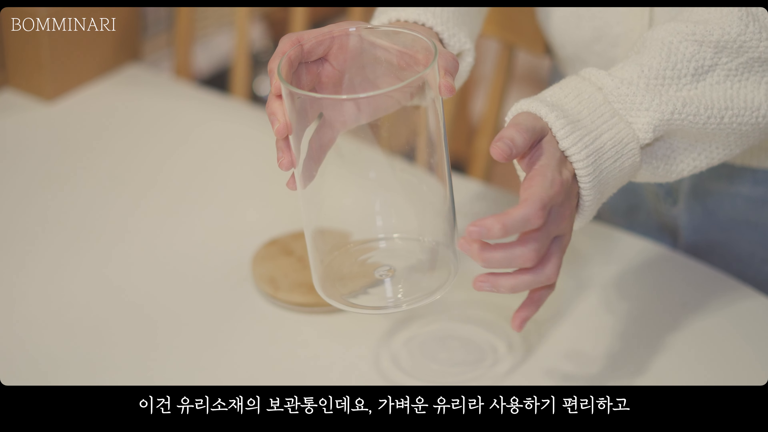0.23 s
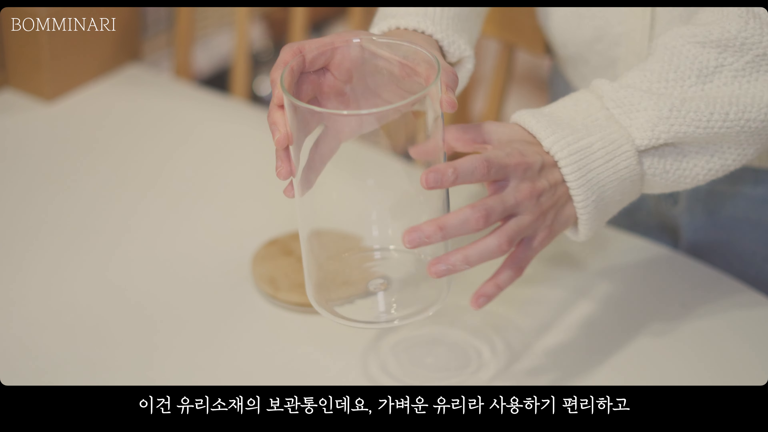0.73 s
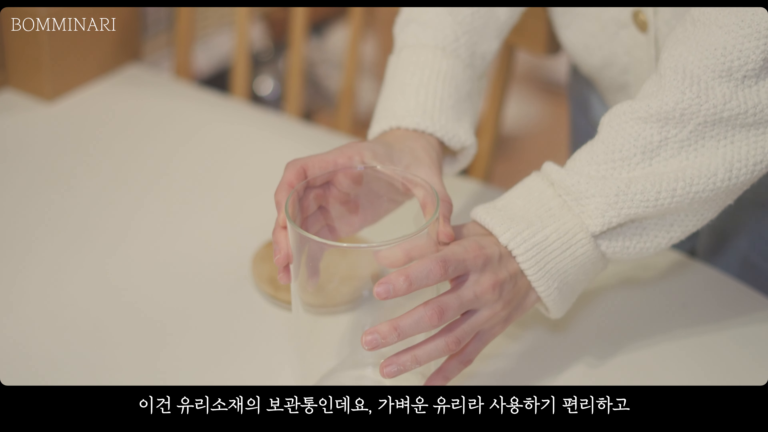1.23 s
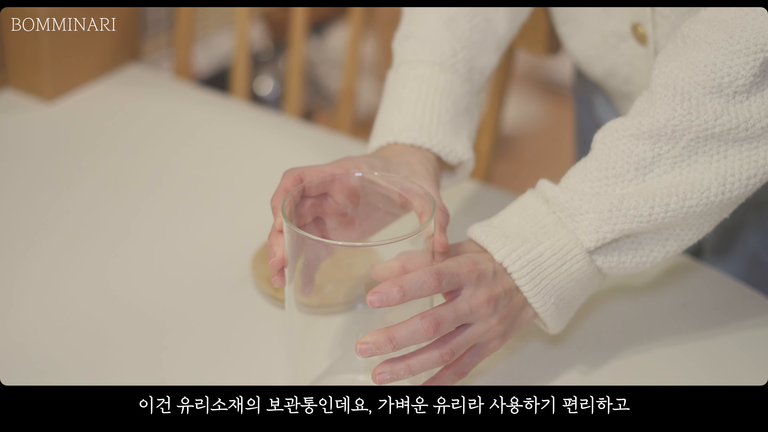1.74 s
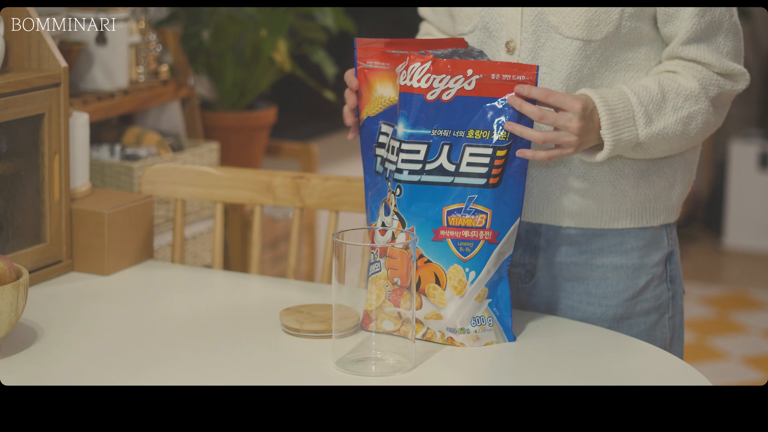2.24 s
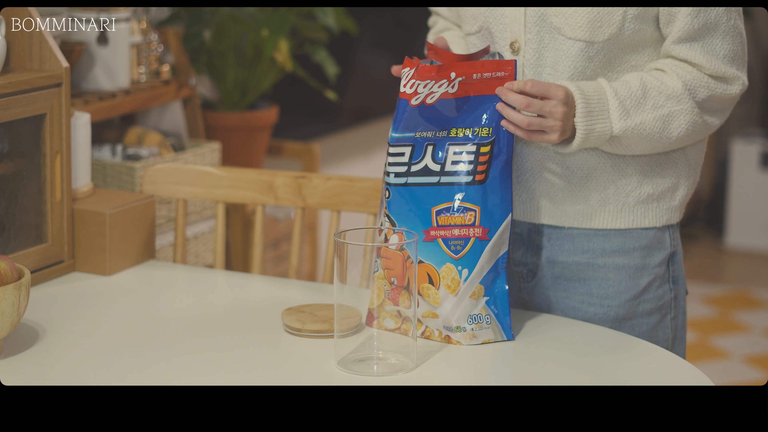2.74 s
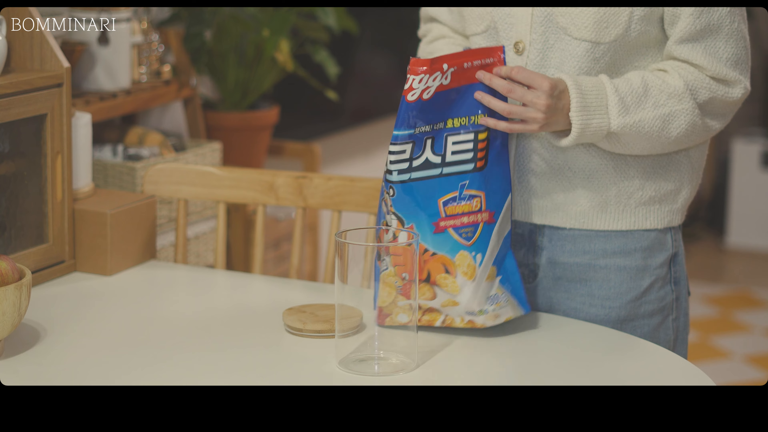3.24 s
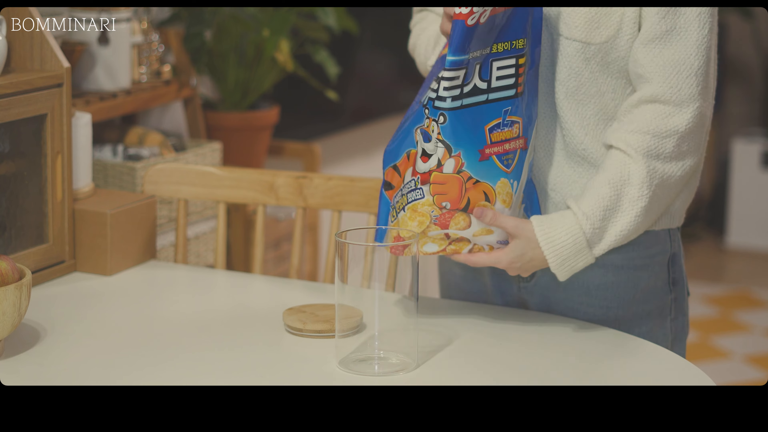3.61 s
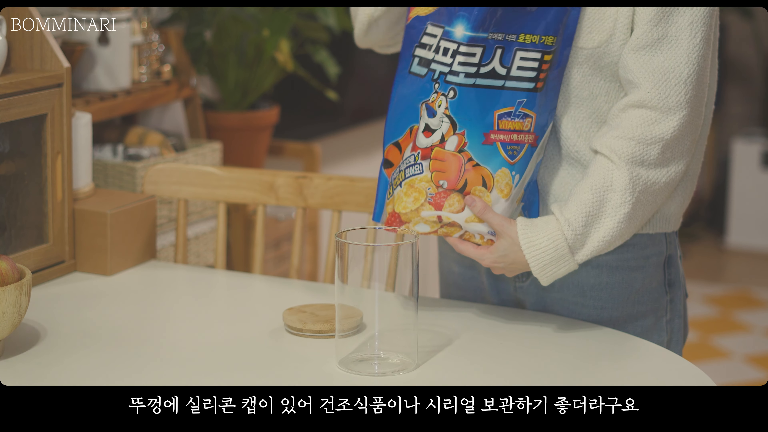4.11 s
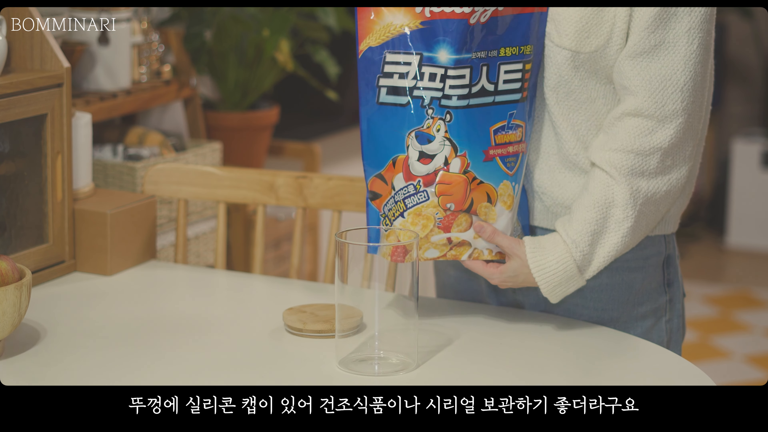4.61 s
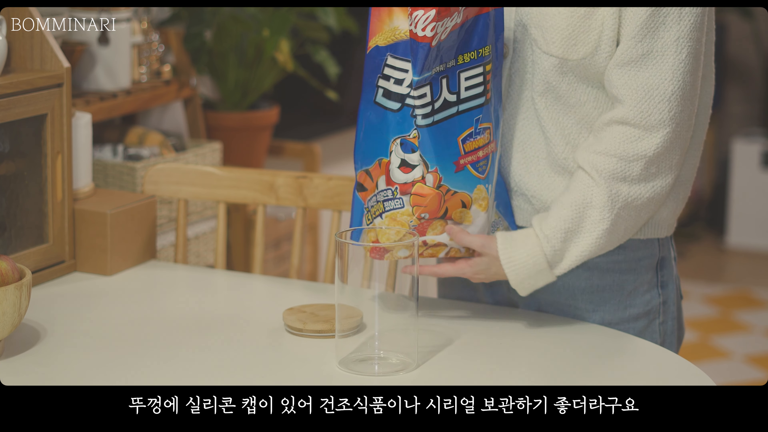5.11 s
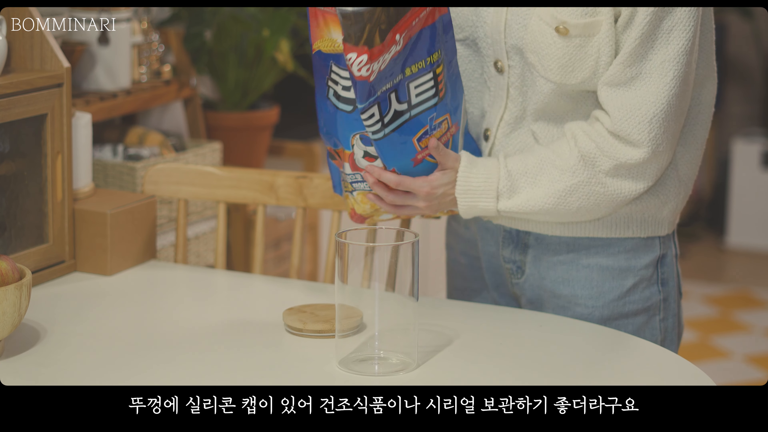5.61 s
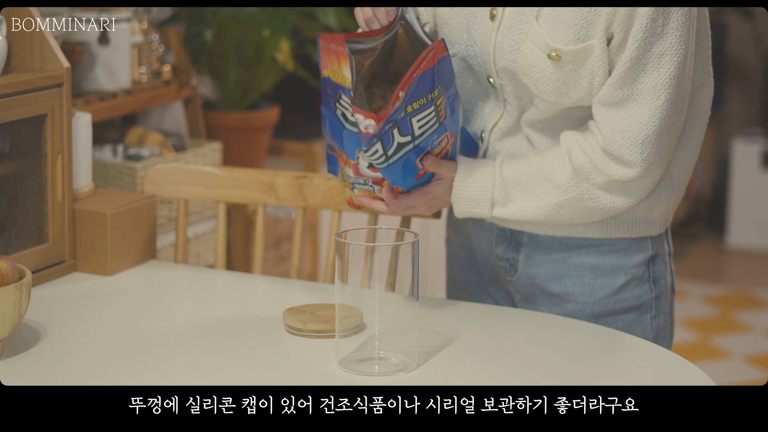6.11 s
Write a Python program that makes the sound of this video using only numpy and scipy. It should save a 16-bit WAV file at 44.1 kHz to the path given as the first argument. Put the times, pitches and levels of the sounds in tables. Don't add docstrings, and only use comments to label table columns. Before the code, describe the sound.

In a small hard kitchen, glass clinks faintly, a wooden lid knocks twice, and a crinkly bag of cereal is noisily gripped and tipped.

```python
import sys
import numpy as np
from scipy import signal
from scipy.fft import rfft, irfft
from scipy.io import wavfile
from scipy.ndimage import uniform_filter1d

SR = 44100
rng = np.random.default_rng(int(sys.argv[2]) if len(sys.argv) > 2 else 0)


def how_loud(loudness_db):
    steps = np.asarray(loudness_db, float) / 20
    return 10 ** steps


def unload_audio(sound):
    columns = np.transpose(np.atleast_2d(sound))
    steps = np.round(np.clip(columns, -1, 1) * 32767)
    wavfile.write(sys.argv[1], SR, steps.astype(np.int16))


N = 280476

# start in seconds, peak of the clear tones in dB,
# peak of the woody noise in dB, time for that noise to die by 60 dB in seconds.
KNOCKS = [
    (1.366, -19.5, -17, 0.24),
    (1.6013, -17.5, -15, 0.075),
]
# time of the peak in seconds, level in dB, rise and fall
# in seconds per 20 dB, brightness in dB.
MOVES = [(2.39, -43, 0.092, 0.05, -9), (2.476, -40, 0.17, 0.3, -27), (2.766, -39, 0.27, 0.18, -31),
         (3.039, -36, 0.23, .085, -28), (3.3, -39, 0.19, 0.13, -7), (3.47, -54.5, .5, .3, -6),
         (3.7, -45, 0.064, 0.44, -1), (3.87, -41.5, 0.39, 0.16, -10), (4.1, -52, 1, 0.3, -1.5),
         (4.3, -43, 0.33, .4, -23), (4.438, -41.5, 0.39, 0.32, -8.5), (4.751, -46.5, .5, 0.06, -3.5),
         (4.988, -40.5, 0.088, 0.35, -7), (5.219, -38.5, 0.37, 0.1, -6), (5.4, -44, 0.23, 1.1, -5.5),
         (5.67, -45.5, 0.095, 0, -12), (5.851, -34.5, 0.46, 0.13, -0.8), (6.029, -37, 0.17, 0.13, -5),
         (6.15, -44, 0.24, 0.27, 3), (6.24, -38.5, 0.37, 0.34, -7.5), (6.34, -51, 0.14, 2.2, 9),
         (2.59, -39, 0.037, 0, -14), (2.915, -46, 0.022, 0, -12), (3.2, -40, 0.039, 0.21, -3)]


def on_log(table, hz):
    f, v = np.transpose(table)
    return np.interp(np.log(np.maximum(hz, 1)), np.log(f), v)


def band(x, lo_hz, hi_hz, order=2):
    sos = signal.butter(order, [lo_hz, min(hi_hz, 0.48 * SR)], "band", fs=SR, output="sos")
    return signal.sosfilt(sos, x)


def unit(x):
    return x / np.sqrt(np.mean(x ** 2))


def fade(t, t60):
    return np.exp(-np.log(1000) * t / t60)


def add(out, s, sound, db):
    i = int(s * SR)
    out[i:i + len(sound)] += (how_loud(db) * sound / np.abs(sound).max())[:N - i]


def walk(rate):
    k = int(SR / rate)
    held = np.repeat(rng.standard_normal(N // k + 1), k)
    return 1.1 * uniform_filter1d(held, k)[:N]


def ring(modes, damp, tilt_db, spread_db, rise_s, split):
    hz, db, t60 = np.repeat(modes, 2, axis=0).T[:, :, None]
    luck, phase = rng.standard_normal((2, len(hz), 1))
    t = np.arange(SR // 3) / SR
    upper = np.arange(len(hz))[:, None] % 2
    gain = how_loud(db + tilt_db * np.log2(hz / 4000) + spread_db * luck - 7 * upper)
    tone = np.sin(2 * np.pi * hz * (1 + split * upper) * t + phase)
    return (gain * fade(t, damp * t60) * tone).sum(0) * np.minimum(t / rise_s, 1)


def handling(share):
    s, db, rise_s, fall_s, bright_db = np.transpose(MOVES)[:, :, None]
    late = np.arange(0, N, 128) / SR - s
    swell = how_loud(db + share * bright_db - 20 * np.maximum(late / fall_s, -late / rise_s))
    return np.repeat(np.sqrt((swell ** 2).sum(0)), 128)[:N]


def rattle():
    # low Hz, high Hz, level against the move in dB, share of the
    parts = [
        (110, 1500, -.9, 0.0065, 0.009),
        (1500, 5080, 1.14, .01, 0.011),
        (5070, 11400, 0, 0.89, 0.092),
        (10100, 16700, -5, 1.2, 1.01),
    ]
    # frequency in Hz, level in dB per Hz.
    flake_colour = [(71, -60), (120, -12), (167, -64), (308, -1.5), (427, -1.5), (988, 2.5), (1160, -1),
                    (2750, -6), (9990, -22), (13300, 0), (16000, -18)]
    # time in seconds, extra dB.
    tautness = [(2.2, 8), (2.6, 4), (3.1, 0), (3.3, -2), (4.2, 1.5), (5.1, 1.5), (5.6, 4.5), (6.0, 10),
                (6.12, -2), (6.3, 6.5)]
    clicks_per_s, size_db, smallest_draw = 700, 2.5, 0.0088
    slide_db = -7
    out = np.zeros((2, N))
    clumps = 1.83 * walk(70)
    hiss = rng.standard_normal((2, N))
    taut_db = np.interp(np.arange(N) / SR, *np.transpose(tautness))
    for lo_hz, hi_hz, part_db, share, fine in parts:
        edges = np.geomspace(lo_hz, hi_hz, 2 + int(2.5 * np.log2(hi_hz / lo_hz)))
        layer = 0
        for lo, hi in zip(edges, edges[1:]):
            when, size, place = rng.random((3, 8000))
            hits = (np.cumsum(-np.log(when)) * SR / clicks_per_s).astype(int)
            heard = hits < N
            strength = (-1) ** hits * how_loud(-size_db * np.log(np.maximum(size, smallest_draw)))
            clicks = np.zeros((2, N))
            clicks[:, hits[heard]] = (strength * [np.ones(8000), 2 * place - 1])[:, heard]
            mid, side = band(unit(clicks) + how_loud(slide_db) * hiss, lo, hi, order=1)
            colour_db = on_log(flake_colour, np.sqrt(lo * hi)) + 2.2 * walk(35)
            gain = how_loud(colour_db) * np.sqrt(hi - lo) / np.std(mid)
            layer = layer + gain * (mid + min(lo / 5000, 0.9) * side * np.array([[1], [-1]]))
        out += unit(layer) * handling(share) * how_loud(part_db - 3.5 + clumps + fine * taut_db)
    return out


def snaps():
    # start in seconds, peak dB, ring in Hz, treble dB, after-rattle dB.
    big_folds = [(2.4419, -12.5, 1640, -35, -13.5), (2.582, -13.5, 2000, -33, -12.5),
                 (2.7438, -8, 7500, -37, -13), (2.8068, -16.5, 1610, -21, -23),
                 (2.9063, -14.5, 1860, -40, -5), (2.988, -17, 1440, -17, -28),
                 (3.1894, -17.5, 7700, -10, 0.5), (3.2021, -14, 2310, -25, -3), (3.279, -13, 7200, -13, -9),
                 (3.684, -25.5, 1870, -9.5, 6), (3.8519, -16.5, 2630, -14, -11.5),
                 (4.3257, -22, 2750, -0.5, -9), (4.343, -13, 2430, -14, -15.5),
                 (4.3642, -14, 2480, -20, -17), (4.978, -24, 2660, -24, 4), (5.0104, -17.5, 3480, -11, -18),
                 (5.49, -10.5, 6305, -34, -9.5), (5.5302, -15.5, 2250, -14, -9.5),
                 (5.6549, -22, 4160, -13, -11.5), (5.8171, -18, 1720, -8, -5),
                 (5.8296, -13, 1280, -9, -8.5), (6.0458, -18.5, 1420, -9, -7), (6.102, -12, 6900, -15, -12),
                 (6.2149, -19.5, 1900, -24, -10.5) ]
    # start in seconds, peak dB, ring in Hz, treble dB.
    creases = [(2.2147, -37.5, 6000, -9), (2.302, -33.5, 1160, -24), (2.346, -34.5, 1500, -9),
               (2.3826, -34, 2030, -7), (2.4699, -21, 1450, -22), (2.5385, -28.5, 1450, -16),
               (2.6179, -22.5, 1620, -22), (2.721, -26.5, 1240, -20), (2.8241, -21, 2750, -28),
               (2.9275, -28, 1920, -23), (3.6442, -31, 1240, -8), (3.795, -25.5, 2570, -21),
               (3.8794, -19.5, 1670, -25), (4.086, -29, 1597, -11), (4.1794, -31, 6000, -2.5),
               (6.1701, -22.5, 6500, -15), (4.2988, -29.5, 1300, -11), (4.3532, -17, 1770, -17),
               (4.4034, -17.5, 1330, -17), (4.4979, -30, 1580, -16), (4.6204, -32, 2200, -11),
               (4.9421, -29, 1240, -12), (4.9958, -22, 3700, -11.5), (5.087, -24, 1960, -19),
               (5.372, -32, 1220, -3), (5.301, -29.5, 1150, -20), (5.8642, -18, 2070, 0),
               (6.0002, -24.5, 1910, -15), (6.062, -20.5, 1140, -15), (6.2732, -25, 1280, -17)]
    folds = [*big_folds, *[(*row, -13) for row in creases]]
    out, t = np.zeros(N), np.arange(SR // 8) / SR
    for s, db, hz, treble_db, rattle_db in folds:
        noise = rng.standard_normal((3, len(t)))
        steps = noise[0] * how_loud(6.5 * np.abs(noise[1])) * fade(t, 0.02) * np.minimum(0.5 + t / 0.004, 1)
        loose = noise[1] * how_loud(3.55 * noise[2]) * fade(t, 0.19) * np.minimum(t / 0.0031, 1)
        steps = steps / np.abs(steps).max() + how_loud(rattle_db) * loose / 4
        add(out, s, band(steps, 1000, 6500), db - 4.5)
        add(out, s, band(steps, hz / 1.122, hz * 1.143, order=1), db - 7)
        add(out, s, band(steps, 6000, 13500), db + treble_db)
        thud_db = -18.5 - 0.17 * (db + 26)
        add(out, s, band(steps, 385, 1900), db + thud_db)
    return out


def slumps():
    # start in seconds, peak dB.
    drops = [(2.35, -41), (2.385, -40), (2.53, -32), (2.915, -38), (3.03, -32), (3.21, -35), (3.428, -49),
             (3.642, -47), (3.741, -41), (3.911, -40), (4.031, -45.5), (4.28, -43), (4.32, -38),
             (4.345, -28), (4.61, -42), (4.992, -36.5), (5.2, -37.5), (5.295, -36.5), (5.378, -49.5),
             (5.51, -36), (5.648, -41), (5.8, -32), (5.86, -36), (6.02, -39), (6.055, -35), (6.21, -34)]
    out, t = np.zeros(N), np.arange(SR // 6) / SR
    rise_s, t60_s = 0.0092, 0.12
    for s, db in drops:
        push = rng.standard_normal(len(t)) * fade(t, t60_s) * (1 - np.exp(-t / rise_s))
        add(out, s, band(push, 252, 1060), db - 1)
    return out


def strays():
    out, t = np.zeros(N), np.arange(SR // 100) / SR
    ticks_per_s, level_db, spread_db = 60, 6, 3.5
    gap, size, pitch = rng.random((400, 3)).T
    at = MOVES[0][0] + np.cumsum(-np.log(gap)) / ticks_per_s
    for s, db, hz in zip(at, -spread_db * np.log(size), 1200 * 6 ** pitch):
        if s < N / SR:
            tick = np.sin(2 * np.pi * hz * t) * fade(t, 8 / hz)
            add(out, s, tick, level_db + min(db, 12))
    return out * handling(0.26)


def lid():
    # frequency in Hz, level in dB, time to die by 60 dB in seconds.
    first_tones = [(437, -24, 0.26), (470, -15, 0.49), (545, 1, 0.57), (660, 9, 0.2), (854, -3, 0.28),
                   (950, -1, 0.16), (1170, -26, 0.5), (1280, 10, 0.22), (1460, -18, 0.25), (1920, 4, 0.29),
                   (2630, -37, 0.3), (6600, -42.5, 0.48)]
    second_tones = [(507, -13, 0.22), (715, -2, 0.24), (904, -1.5, 0.28), (945, -22, 0.27),
                    (1240, -11, 0.29), (1830, -12, 0.29), (2825, -19.5, 0.38)]
    # frequency in Hz, level in dB per Hz.
    first_wood = [(88, -58), (150, -11.5), (223, -22), (339, -16.5), (487, -6.5), (588, -8), (672, -6.5),
                  (739, -6), (1380, -13.5), (1740, -20), (2140, -15.5), (2490, -25.5), (5020, -36.5),
                  (14000, -59)]
    second_wood = [(71, -68), (120, -49), (346, -15), (412, -38), (499, 1), (594, -5), (1240, -7.5),
                   (12000, -59.5), (15600, -99), (22000, -120)]
    out, t = np.zeros(N), np.arange(SR // 3) / SR
    hz = np.fft.rfftfreq(len(t), 1 / SR)
    sounds = [(first_tones, first_wood), (second_tones, second_wood)]
    for (s, db, wood_db, t60), (tones, wood) in zip(KNOCKS, sounds):
        add(out, s, ring(tones, damp=0.15, tilt_db=0, spread_db=0.8, rise_s=0.0008, split=0.03), db)
        dense = irfft(rfft(rng.standard_normal(len(t))) * how_loud(on_log(wood, hz)), len(t))
        add(out, s, dense * fade(t, t60) * np.minimum(t / 0.00034, 1), wood_db)
    return out


def glass():
    # start in seconds, peak dB, brightness in dB per octave.
    ticks = [
        (0.012, -23, 0),
        (0.2121, -25, 0.5),
        (0.3978, -25.5, 0.5),
        (0.5347, -21, 1),
    ]
    # frequency in Hz, level in dB, time to die by 60 dB in seconds.
    glass_tones = [(661, -8.5, 0.24), (2332, -18.5, 0.64), (3311, -2, 0.28), (4120, -1.5, 0.26),
                   (4350, -5.5, 0.22), (5390, -22.5, 0.63), (6070, -1, 0.078), (6230, 4.5, 0.12),
                   (6790, 0.5, 0.093), (7354, -6, 0.38), (7700, -20, 0.6), (8460, -10, 0.26),
                   (9290, 0, 0.096), (9500, -14, 0.47), (10100, -20, 0.28), (10600, -19, 0.22),
                   (11600, -16, 0.42), (12080, -12, 0.29), (13180, -28, 0.19), (13920, -12, 0.15),
                   (14220, -33, 0.058), (15200, -12, 0.19)]
    # Hz, dB, time to die by 60 dB in seconds.
    shaken_tones = [(4370, -1, 0.24), (6568, -2, 0.32), (7400, -8, 0.31), (9700, -1, 0.18)]
    out, t = np.zeros(N), np.arange(SR // 10) / SR
    for s, db, tilt_db in ticks:
        tones = ring(glass_tones, damp=0.22, tilt_db=tilt_db, spread_db=-1.3, rise_s=0.0019, split=0.0036)
        add(out, s, tones, db - 2.5)
        add(out, s, band(rng.standard_normal(len(t)), 500, 17000) * fade(t, 0.04), db - 14)
        add(out, s, band(rng.standard_normal(len(t)), 700, 1780) * fade(t, 0.036), db - 23)
    shaken = ring(shaken_tones, damp=0.76, tilt_db=0, spread_db=0.5, rise_s=0.001, split=0.0089)
    add(out, KNOCKS[0][0], shaken, -45)
    return out


def room(x):
    # frequency in Hz, time in seconds.
    room_t60 = [(200, 0.53), (530, 0.31), (1390, 0.4), (3680, 0.22), (9700, 0.2)]
    # delay in seconds, level in dB, left minus right in dB.
    echoes = [
        (.0042, -16, 12.5),
        (.0075, -13.5, -18),
        (.013, -8, 8.5),
    ]
    t, tail = np.arange(int(0.6 * SR)) / SR, 0
    for hz in 90 * 2.0 ** np.arange(8):
        mid, side = band(rng.standard_normal((2, len(t))), hz / np.sqrt(2), hz * np.sqrt(2))
        width = min(hz / 2060, 1.1) ** 1.1
        tail = tail + fade(t, on_log(room_t60, hz)) * (mid + width * side * np.array([[1], [-1]]))
    tail = tail * np.clip((t - 0.003) / 0.018, 0, 1)
    tail = how_loud(-1.5) * tail / np.sqrt((tail ** 2).sum() / 2)
    for s, db, pan_db in echoes:
        i = int(s * SR)
        tail[:, [i, i + 3]] += np.diag(how_loud(db + np.array([pan_db, -pan_db]) / 2))
    return signal.fftconvolve(x[None], tail, axes=1)[:, :N]


def air():
    # frequency in Hz, level in dB per Hz.
    hiss_colour = [(15, -58), (25, -24), (76, -17.5), (138, -12), (232, -0.5), (368, -2.5), (568, -1),
                   (634, 1.5), (726, -4), (902, 0), (1390, -10.5), (1550, -8), (3810, -15), (15200, -18.5),
                   (16500, -34)]
    # frequency in Hz, rms level in dB.
    hum = [(242.2, -77.5), (624.5, -83), (1001, -101)]
    hz, t = np.fft.rfftfreq(N, 1 / SR), np.arange(N) / SR
    width = [hz > 0, np.minimum(hz / 2500, 0.8)]
    mid, side = irfft(rfft(rng.standard_normal((2, N))) * how_loud(on_log(hiss_colour, hz)) * width, N)
    noise = np.array([mid + side, mid - side]) * how_loud(-67) / np.std(mid)
    fridge = sum(np.sqrt(2) * how_loud(db) * np.sin(2 * np.pi * f * t) for f, db in hum)
    return noise + how_loud(1.2 * walk(8.6)) * fridge


def scene():
    flakes = rattle()
    folds = snaps() + slumps() + strays()
    knocks, ticks = lid(), glass()
    to_room = how_loud(-1.5) * ticks + how_loud(-3.5) * knocks + how_loud(-5.5) * folds + how_loud(-9) * flakes.mean(0)
    left_right = how_loud(np.array([[0.3], [-0.3]]))
    heard = left_right * (ticks + knocks + folds + flakes) + room(to_room)
    return band(heard, 232, 20000, order=3) + air()


def low_pass(x):
    return signal.sosfilt(signal.butter(12, 16820, fs=SR, output="sos"), x)


def record(dry):
    cut = signal.sosfilt(signal.ellip(12, 0.2, 60, 15850, fs=SR, output="sos"), dry)
    return low_pass(cut)


dry = scene()
out = record(dry)
unload_audio(out)
```